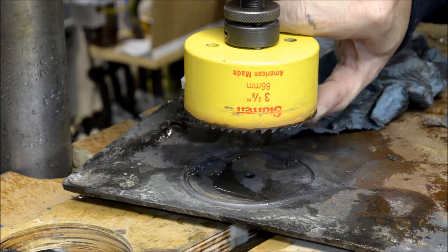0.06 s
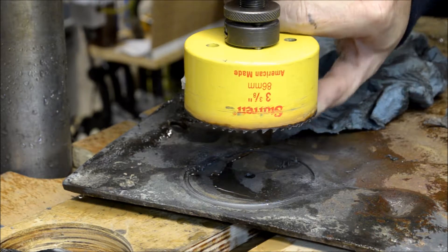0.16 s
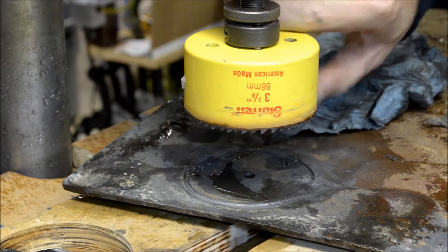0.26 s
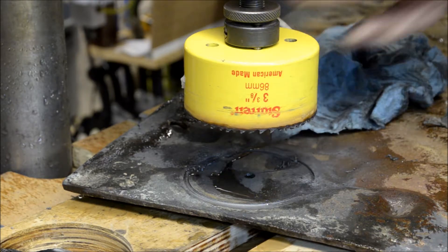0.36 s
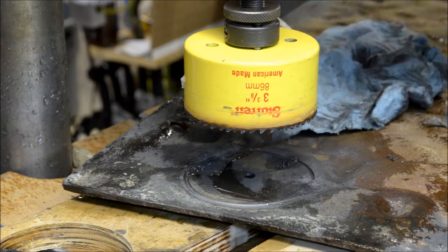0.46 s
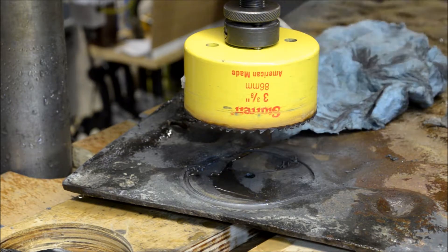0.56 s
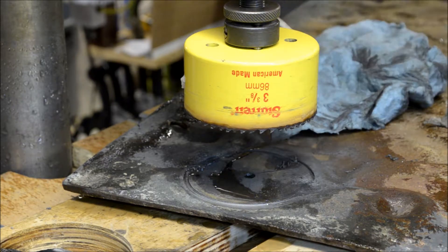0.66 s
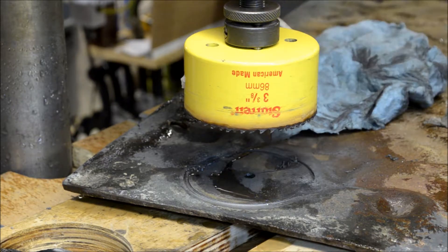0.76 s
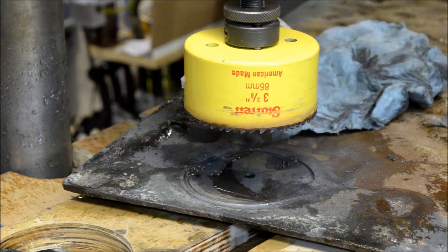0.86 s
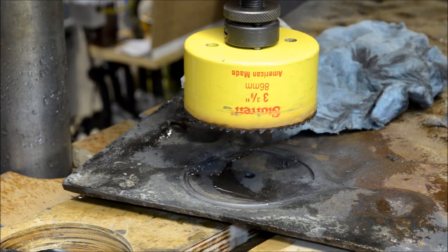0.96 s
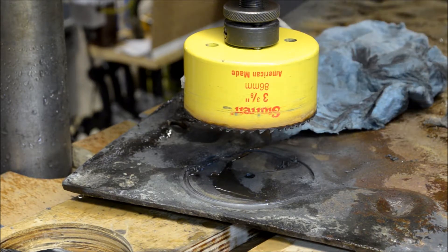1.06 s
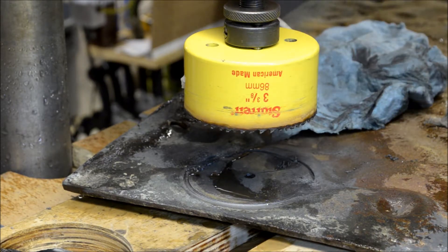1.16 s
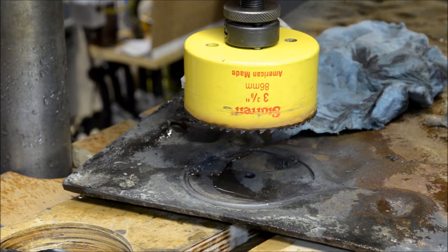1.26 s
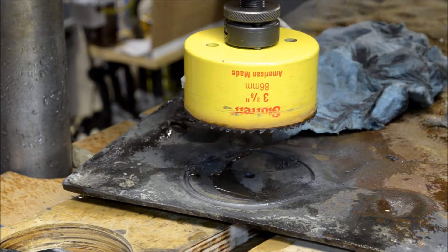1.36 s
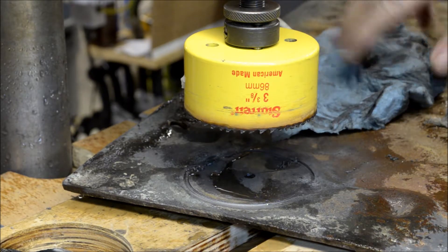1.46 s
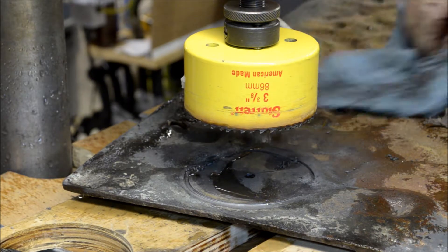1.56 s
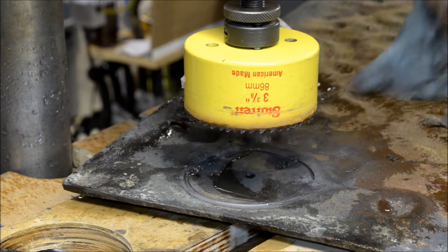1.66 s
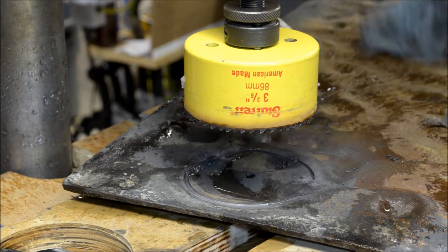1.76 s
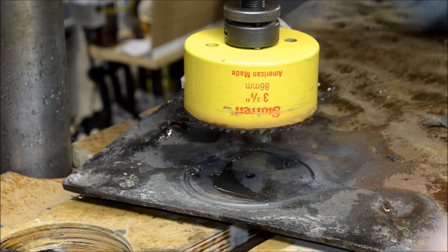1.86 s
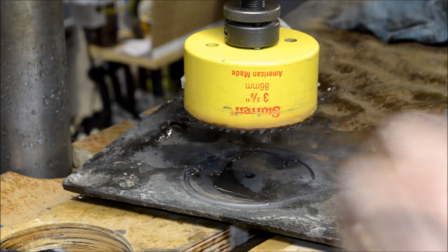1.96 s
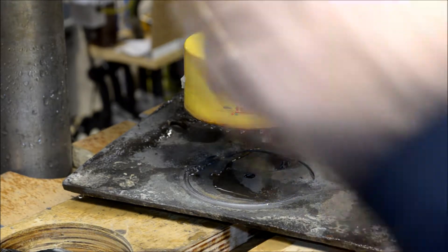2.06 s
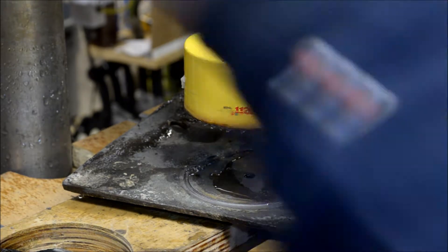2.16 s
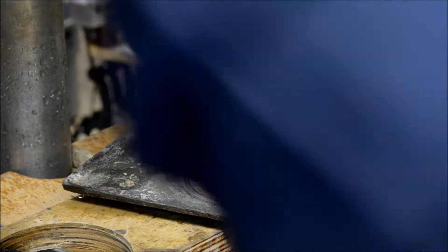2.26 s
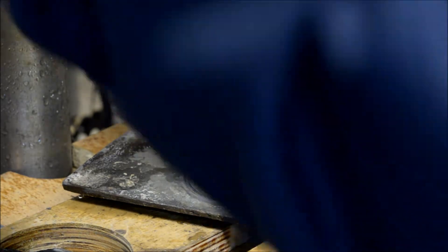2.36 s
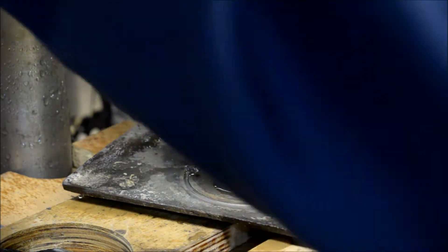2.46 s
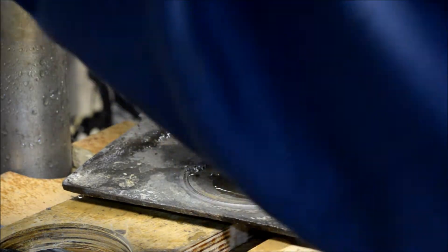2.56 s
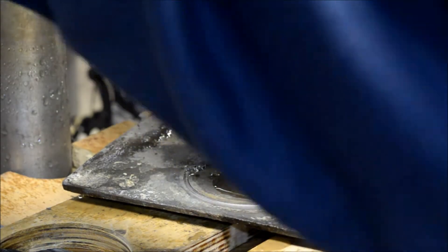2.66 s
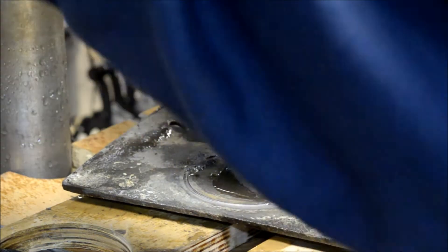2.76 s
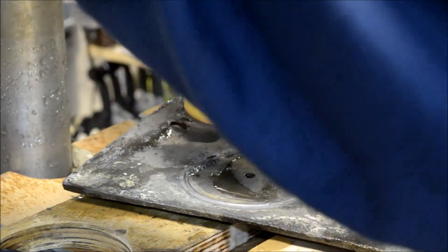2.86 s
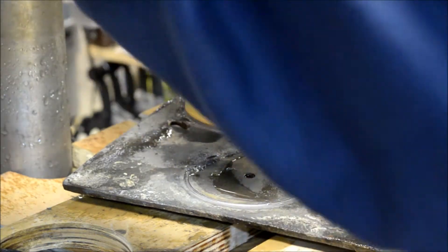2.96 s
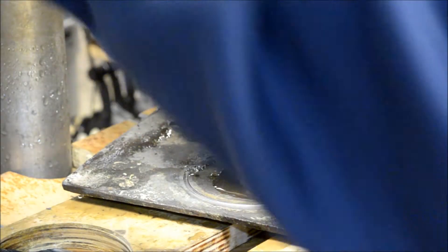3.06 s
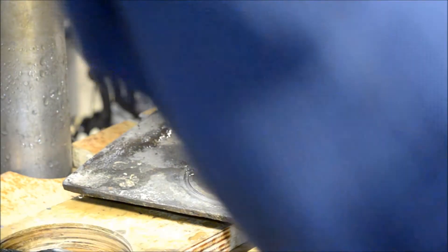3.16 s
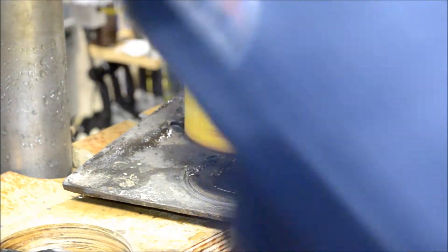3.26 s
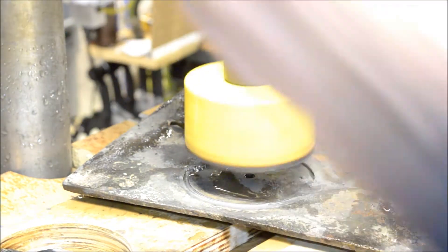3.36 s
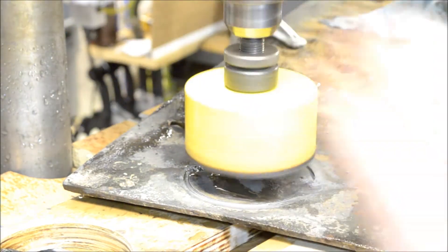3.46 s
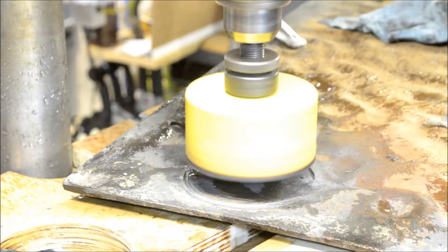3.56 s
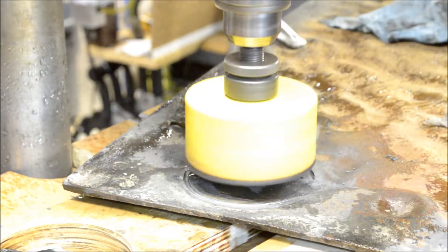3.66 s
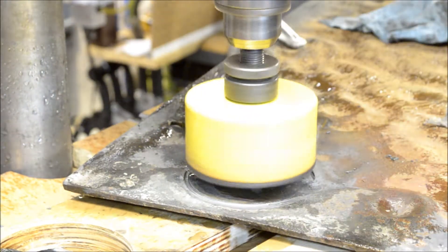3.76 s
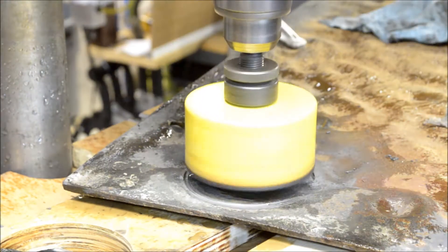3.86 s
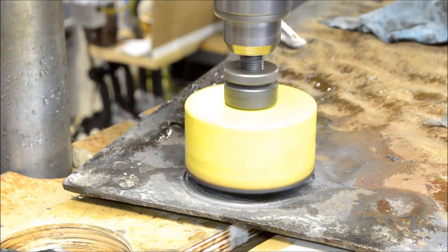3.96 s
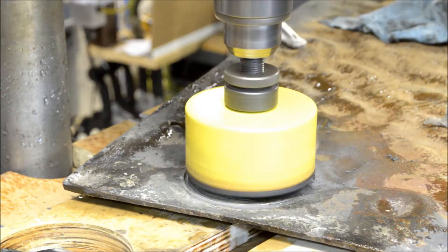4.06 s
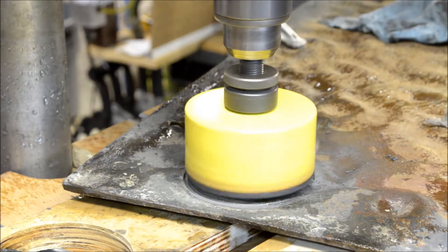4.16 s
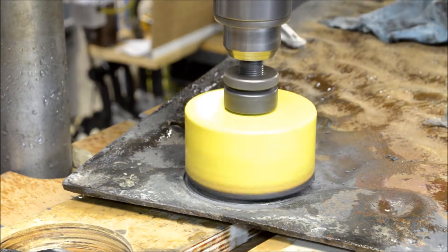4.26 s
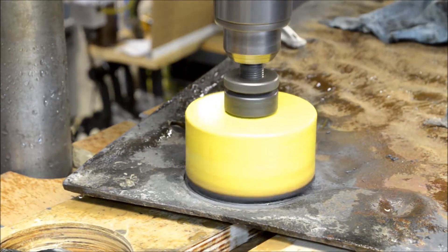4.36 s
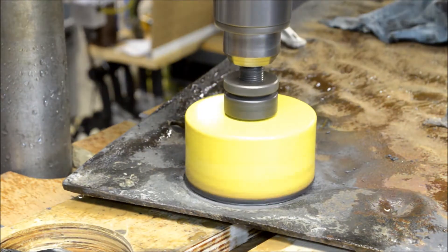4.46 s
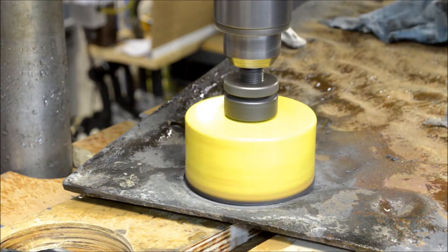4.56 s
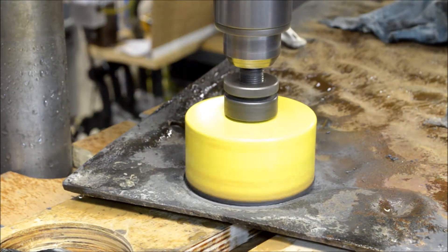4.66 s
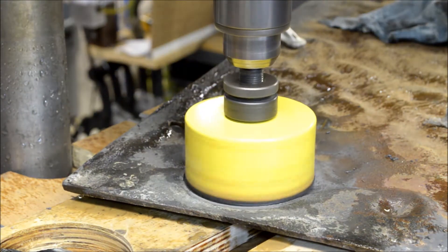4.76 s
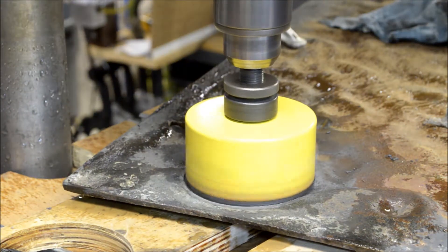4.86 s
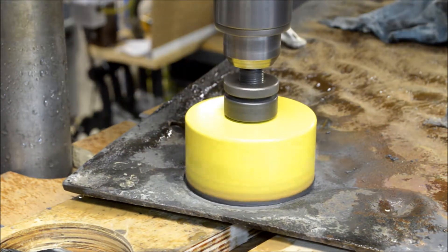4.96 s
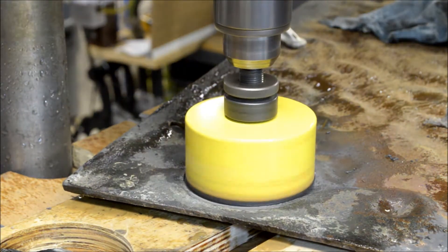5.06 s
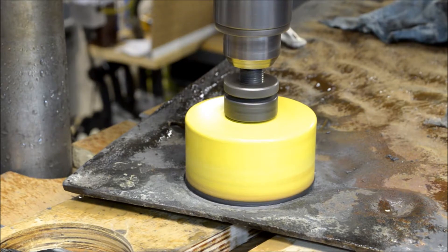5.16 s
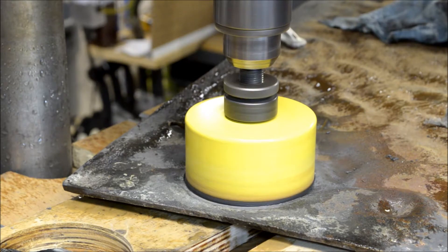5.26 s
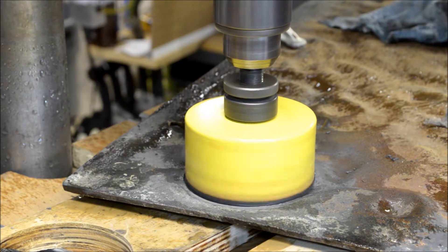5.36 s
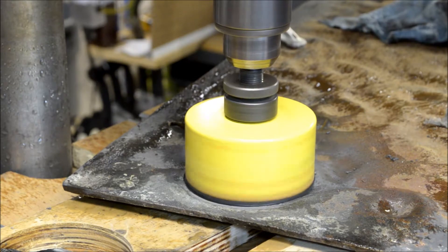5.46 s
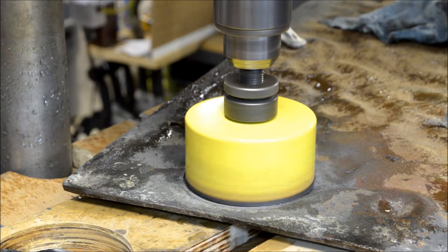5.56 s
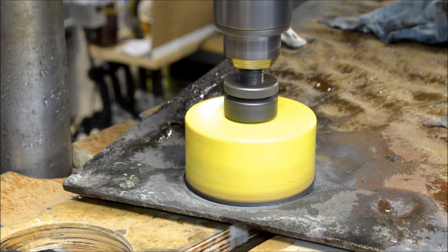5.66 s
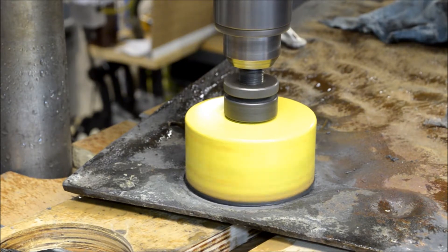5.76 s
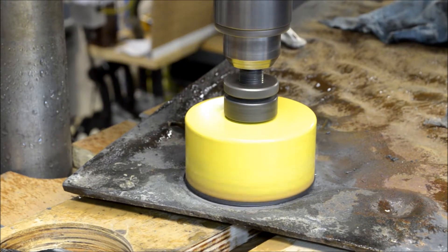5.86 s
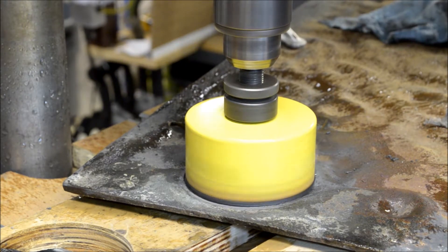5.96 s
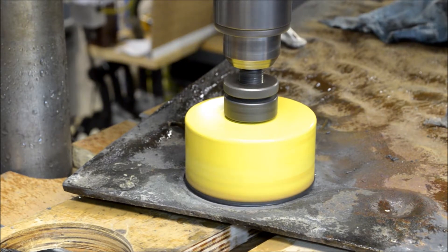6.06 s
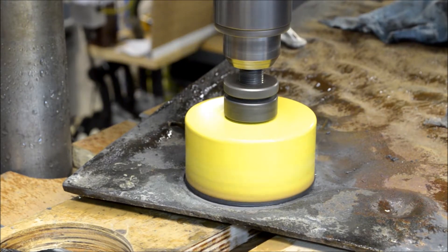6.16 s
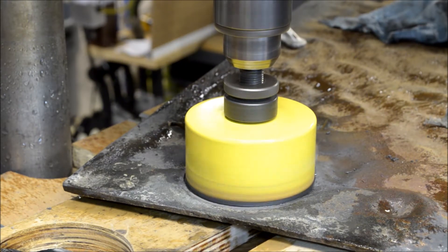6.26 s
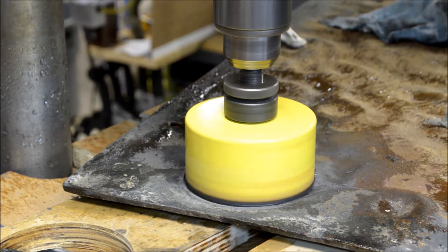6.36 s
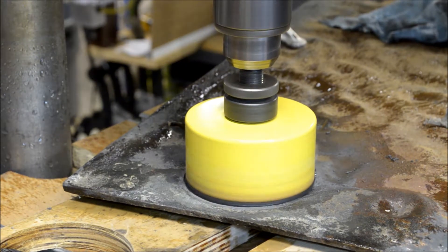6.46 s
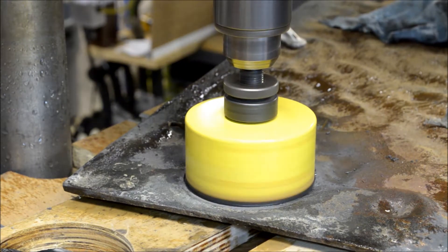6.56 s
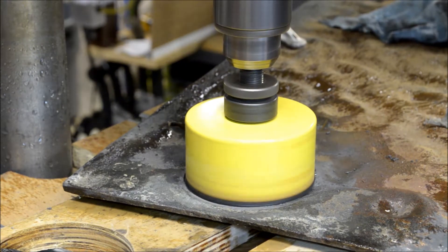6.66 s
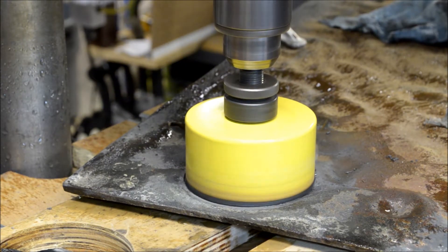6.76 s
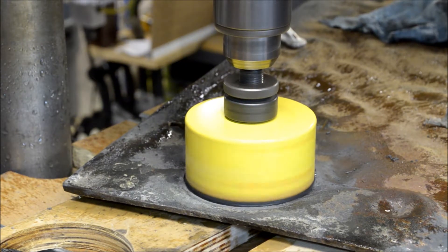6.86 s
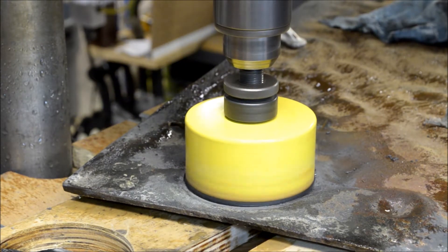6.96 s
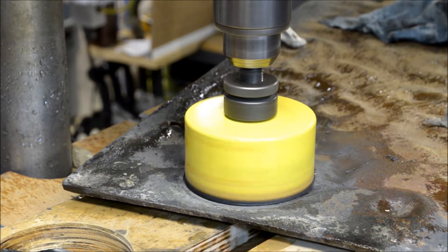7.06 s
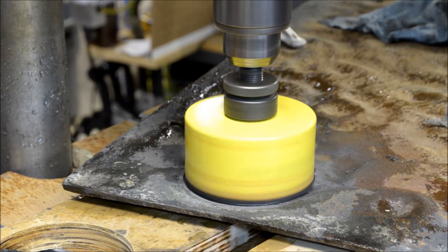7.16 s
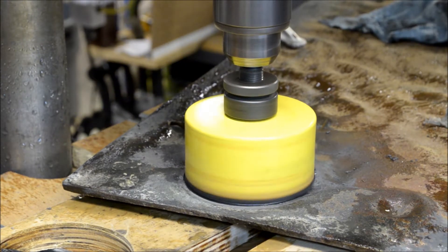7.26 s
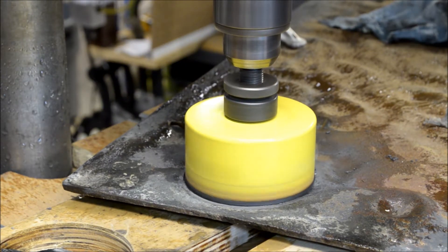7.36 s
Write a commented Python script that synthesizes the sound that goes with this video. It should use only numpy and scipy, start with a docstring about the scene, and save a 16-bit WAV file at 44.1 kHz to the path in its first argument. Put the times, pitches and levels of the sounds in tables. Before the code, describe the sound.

In a small workshop, light knocks on a bench mix with the faint rustle of a rag and sleeve. A switch snaps and a drill press jerks up to speed, humming and rattling as its shaft lowers. A hole saw skims a thick iron plate, then bites with a loud, ringing scrape that pulses rapidly. It eases off and touches down again near the end, all heard close up.

```python
"""A hole saw on a drill press cuts a thick iron plate: its teeth tear off chips with a loud, ringing scrape
that swells once a turn. First come light knocks and the rustle of a rag and sleeve in a small workshop.
Then the switch snaps, the motor jerks up to speed and the quill (the sliding shaft that lowers the saw)
rattles down. The saw skims the plate, bites, is eased off and comes down again.
Automatic gain control turns loud sound down, so the motor seems quieter while the saw cuts."""
import sys
import numpy as np
from scipy import signal
from scipy.fft import rfft, irfft
from scipy.io import wavfile
from scipy.ndimage import uniform_filter1d, minimum_filter1d, map_coordinates

SR = 44100
rng = np.random.default_rng(int(sys.argv[2]) if len(sys.argv) > 2 else 0)


def waveform_to_disk(signal):
    """Save audio, clipped to [-1, 1], as 16-bit WAV at the path in sys.argv[1]."""
    frames = np.transpose(np.atleast_2d(signal))
    scaled = np.clip(frames, -1, 1) * 32767
    samples = np.round(scaled).astype(np.int16)
    wavfile.write(sys.argv[1], SR, samples)


N = 326340
TIME = np.arange(N) / SR
FFT_SIZE = 2 ** 14
HZ = np.fft.rfftfreq(FFT_SIZE, 1 / SR)


def amp(db):
    """Turn decibels into a number to multiply by."""
    return 10 ** (np.asarray(db) / 20)


def unit(x):
    """Scale to an average (rms) strength of 1."""
    return x / np.sqrt(np.mean(x ** 2) + 1e-20)


def wobble(rate):
    """A smooth random curve with rate new values a second."""
    values = rng.standard_normal(N // 40)
    coarse = TIME[::8]
    return np.interp(TIME, coarse, map_coordinates(values, [coarse * rate], mode="mirror"))


def fade_in(start, length):
    """A ramp from 0 to 1; times in seconds."""
    return np.clip((TIME - start) / length, 0, 1)


def held(start, hold, rise, fall):
    """A loudness curve that rises, holds and dies away; times in seconds."""
    return fade_in(start, rise) * np.exp(-(np.maximum(TIME - start - hold, 0) / fall) ** 2)


def swells(rows):
    """One loudness curve for many touches, each rising to a peak and falling."""
    power = np.zeros(N)
    for at, db, rise, fall in rows:
        near = slice(max(0, int(at * SR) - SR // 3), int(at * SR) + SR // 3)
        t = TIME[near] - at
        power[near] += amp(db) ** 2 * np.exp(-2 * np.maximum(-t / rise, t / fall))
    return np.sqrt(power)


def grit(rate, spread_db):
    """A rough force: countless tiny snaps that bunch up rate times a second."""
    return unit(rng.standard_normal(N) * amp(spread_db * wobble(rate)))


def blow(at, t60, room_db, room_t60):
    """A short hit and the room's echo of it; a t60 is the seconds taken to fade by 60 dB."""
    t = np.arange(SR // 2) / SR
    fade = np.hypot(amp(-60 * t / t60), amp(room_db - 60 * t / room_t60))
    return np.pad(rng.standard_normal(len(t)) * fade, (round(at * SR), N))[:N]


def tones(rows, drift, drift_rate):
    """Pure tones that waver a little; drift is in radians."""
    return sum(amp(db) * np.sqrt(2) * np.sin(2 * np.pi * hz * TIME + drift * wobble(drift_rate))
               for hz, db in rows)


def ringing_filter(x, gain):
    """Give each frequency its own gain, so that ringing follows a hit (minimum phase)."""
    cepstrum = irfft(np.log(np.maximum(gain, 1e-6)), FFT_SIZE)
    cepstrum[1:FFT_SIZE // 2] *= 2
    cepstrum[FFT_SIZE // 2 + 1:] = 0
    return signal.oaconvolve(x, irfft(np.exp(rfft(cepstrum)), FFT_SIZE))[:N]


def body(force, colour, notes=()):
    """A shaken object has a colour (its mix of low and high) and ringing notes that stand above it."""
    hz, db = np.transpose(colour)
    broad = amp(np.interp(np.log(HZ + 1), np.log(hz), db))
    peaks = sum(amp(level) ** 2 / (1 + (2 * (HZ - centre) / width) ** 2)
                for centre, width, level in notes)
    return ringing_filter(force, unit(broad * np.sqrt(1 + peaks)))


def walls(x, echo_db, t60):
    """The drill's table, its column and the walls throw back many quick echoes."""
    t = np.arange(SR // 4) / SR
    echoes = rng.standard_normal(len(t)) * amp(-60 * t / t60) * (t > .002)
    reflected = signal.fftconvolve(x, echoes / np.linalg.norm(echoes))[:N]
    return (x + amp(echo_db) * reflected) / np.hypot(1, amp(echo_db))


# colour of the room's air, and the tones of its hum: f/Hz, level/dB
AIR_COLOUR = [(15, -42), (25, -13), (75, -10), (250, -5.5), (309, -8), (543, -6.5), (588, -10), (1460, -14),
              (1760, -13), (3010, -18.5), (4500, -21), (5570, -22), (8320, -27), (15000, -38)]
SHOP_HUM = [(57, -75), (120, -84.5), (529, -73)]
def shop():
    """Still air and a faint, steady hum."""
    air = amp(-67) * body(rng.standard_normal(N), AIR_COLOUR)
    return air + tones(SHOP_HUM, drift=0.6, drift_rate=9.8)


# strokes of rag and sleeve, and one brisk brush: t/s, level/dB, rise/s, fall/s
RAG_STROKES = [(.72, -60, 0.1, 0.16), (1.6, -62, 0.06, .12), (2.42, -64.5, 0.45, 0.27),
               (2.68, -58, 0.076, 0.075)]
BRISK_BRUSH = [(.872, -47, .016, .034)]
# colours of the strokes and of the brush: f/Hz, level/dB
RAG_COLOUR = [(60, -16), (200, 1), (700, 0.5), (2000, 2), (4500, -2.5), (8500, -4.5), (11000, -14),
              (15000, -32)]
BRUSH_COLOUR = [(60, -19), (170, 10), (300, 1), (1200, -5), (3000, -3), (4200, 1), (5200, -7), (8500, -6),
                (11000, -23), (15000, -28)]
def cloth():
    """Fibres rub as a rag is pulled away and a sleeve sweeps past."""
    rubbing = swells(RAG_STROKES) * grit(rate=400, spread_db=1.3)
    brushing = swells(BRISK_BRUSH) * grit(rate=340, spread_db=-1.5)
    return body(rubbing, RAG_COLOUR) + body(brushing, BRUSH_COLOUR)


# things set down: t/s, clack level/dB, thud level/dB, wait until the drop/s
BENCH_KNOCKS = [(0.139, -43, -42, 0.012), (0.256, -36, -36, .002), (0.835, -37.5, -45, .004),
                (1.014, -33.5, -23, .03), (1.17, -37.5, -26.5, .002), (1.232, -36.5, -26, .018),
                (1.346, -39, -27, .002), (2.49, -28, -26, 0.024)]
# the bench's colour: f/Hz, level/dB; its notes: f/Hz, width/Hz, boost/dB
BENCH_COLOUR = [(60, -19), (200, -11), (400, -2), (1400, 2.5), (2500, -20.5), (4500, -24.5), (7000, -23),
                (14000, -50)]
BENCH_NOTES = [(412, 40, 13.6), (802, 40, 10.6), (886, 40, 11), (1331, 26, 12), (2280, 240, 15.7),
               (2620, 120, 19), (3414, 306, 15.7), (4107, 590, 10), (5000, 220, 12)]
def knocks():
    """Each thing clacks on the bench with an edge, then drops flat with a clack and a thud."""
    soft, hard = np.zeros(N), np.zeros(N)
    for start, clack_db, thud_db, wait in BENCH_KNOCKS:
        edge, drop = [blow(at, t60=0.054, room_db=-4.5, room_t60=0.29) for at in (start, start + wait)]
        soft += amp(thud_db) * (amp(-11) * edge + drop)
        hard += amp(clack_db) * (edge + amp(-2) * drop)
    thud = signal.lfilter(*signal.butter(2, 620, "low", fs=SR), soft)
    clack = signal.lfilter(*signal.butter(2, 620, "high", fs=SR), hard)
    return amp(-9.5) * body(thud - clack, BENCH_COLOUR, BENCH_NOTES)


# sharp ticks: t/s, relative level/dB
SHARP_TICKS = [(0.26, -56), (1.344, -58), (1.7469, -51.5), (1.803, -58), (1.8392, -54), (2.82, -46),
               (2.8498, -15.5), (3.0071, -19.5)]
# the ticks' colour: f/Hz, level/dB; their notes: f/Hz, width/Hz, boost/dB
TICK_COLOUR = [(60, -30), (300, -1), (1500, -13), (5000, -7), (9000, 5), (15000, -15)]
TICK_NOTES = [(3430, 350, 21), (8450, 250, 2.8)]
def ticks():
    """Sharp ticks: the bright edge of two bench knocks, small clicks, and the switch's loud snap."""
    force = sum(amp(db - 7.5) * blow(at, t60=0.063, room_db=-19, room_t60=0.17)
                for at, db in SHARP_TICKS)
    return body(force, TICK_COLOUR, TICK_NOTES)


# the saw slows down as it works: t/s, speed/(turns per s)
SAW_SPEED = [(4.55, 11.9), (4.9, 11.08), (5.55, 11.2), (5.9, 10.47), (6.5, 10.15), (7.0, 10.35),
             (7.3, 11.5)]
def saw_angle():
    """How far the saw has turned, in radians; it digs deepest near each whole turn."""
    turns = np.cumsum(np.interp(TIME, *np.transpose(SAW_SPEED))) / SR
    deepest_s = 4.92
    return 2 * np.pi * (turns - np.interp(deepest_s, TIME, turns))


MOTOR_ON_S, SURGE_S, FEED_S = 2.858, 0.18, 3.786  # motor starts; how long it strains; quill starts down
def effort():
    """The motor strains at first, settles, then works a little harder as the quill goes down."""
    idle_db = -34.5
    surge_db = 8 * held(MOTOR_ON_S, SURGE_S, rise=.002, fall=0.05)
    feed_db = 2 * fade_in(FEED_S, 0.04)
    return amp(idle_db + surge_db + feed_db) * fade_in(MOTOR_ON_S, 0.0059)


# the motor's tones (close ones throb together): f/Hz, relative level/dB
MOTOR_HUM = [(59.3, -47), (118.6, -28.5), (232, -22), (239.8, -13.5), (250, -15), (329.4, -18),
             (359.5, -13), (389.5, -8.5)]
# the frame's colour: f/Hz, level/dB; its notes: f/Hz, width/Hz, boost/dB
FRAME_COLOUR = [(30, -44), (75, -21), (115, -13.5), (160, -11), (205, -21), (235, -10.5), (440, 5),
                (580, -8.5), (850, -3), (1400, -3), (4500, -11), (6400, -10), (9000, -20), (11000, -31),
                (15000, -47)]
FRAME_NOTES = [(233.3, 4.7, 15), (250, 9.9, 18.2), (332.5, 4.7, 9.2), (387, 30, 4.6), (553.4, 21, 9.6),
               (673, 17, 10.2), (769, 35, 12.4), (870, 86, 9.1), (1116, 54, 6.5), (1210, 20, 6.9),
               (1337, 53, 5.5), (1730, 24, 6.6), (2000, 20, 6.1)]
def motor(angle):
    """The motor hums, belt and bearings shake the frame, and the starting jerk makes it boom."""
    level = effort()
    shake = amp(1.02) * grit(rate=300, spread_db=1.6) * amp(np.cos(angle))
    hum = tones(MOTOR_HUM, drift=0.27, drift_rate=9.9)
    jerk = held(MOTOR_ON_S, SURGE_S, rise=.02, fall=0.016)
    boom = jerk * tones([(251, -29.5), (770, -37), (820, -42)], drift=0.86, drift_rate=23)
    return body(level * shake, FRAME_COLOUR, FRAME_NOTES) + level * hum + boom


def rattles(db, jolt_db):
    """Four rattles, one a turn, as the quill starts down; the extra jolt_db about halves each turn."""
    turn_s, rise_s, fall_s = 1 / SAW_SPEED[0][1], .009, 0.022
    return swells([(FEED_S + k * turn_s, db + jolt_db * 0.51 ** k, rise_s, fall_s) for k in range(4)])


# loose drive parts clatter: t/s, level/dB, rise/s, fall/s
DRIVE_CLATTER = [(2.871, -18, 0.0036, 0.012), (3.03, -30.5, 0.049, 0.038), (4.325, -32.5, .004, 0.024)]
# colours of the quill and its collar: f/Hz, level/dB
QUILL_COLOUR = [(60, -45), (200, -27), (400, 4.5), (620, -4), (1400, 3), (3000, -9), (5000, -6.5),
                (9200, -15), (10500, -26), (15000, -51)]
COLLAR_COLOUR = [(300, -36), (2000, 2.5), (3300, -3.5), (4500, -10.5), (15000, -41)]
# notes of the quill, the collar's chime and its high ring: f/Hz, width/Hz, boost/dB
QUILL_NOTES = [(870, 44, 3.6), (1330, 58, 5.7), (1480, 37, 1.7), (2300, 200, 5), (8850, 250, 6.9),
               (9240, 79, 10.6), (14076, 368, 14)]
CHIME_NOTES = [(2440, 280, 12), (2710, 83, 12), (3150, 120, 16)]
RING_NOTES = [(3215, 130, 18.5), (4020, 120, 12)]
def quill(angle):
    """Loose parts clatter; the collar chimes, and its high ring swells once a turn as the shaft spins."""
    slack = np.hypot(swells(DRIVE_CLATTER), rattles(db=-26, jolt_db=10))
    clatter = body(slack * grit(rate=700, spread_db=2), QUILL_COLOUR, QUILL_NOTES)
    collar_taps = rattles(db=-24.5, jolt_db=0) * grit(rate=770, spread_db=1.0)
    chime = body(collar_taps, COLLAR_COLOUR, CHIME_NOTES)
    collar_shake = effort() * amp(-12 + 2 * np.cos(angle)) * rng.standard_normal(N)
    return clatter + chime + body(collar_shake, COLLAR_COLOUR, RING_NOTES)


# the teeth skim the plate: t/s, hold/s, level/dB
SAW_GRAZES = [(4.468, 0.045, -23), (4.548, .21, -25), (7.134, 0.017, -22.5), (7.254, 0.023, -20.5),
              (7.309, 0.062, -33), (7.383, .02, -26)]
# colour of the saw's steel cup: f/Hz, level/dB; its notes: f/Hz, width/Hz, boost/dB
CUP_COLOUR = [(60, -35), (220, -8), (400, 9), (1000, 3.5), (3000, 1.5), (5000, -4), (9700, -6), (11500, -5),
              (15000, -21)]
CUP_NOTES = [(1236, 106, 11), (3050, 140, 3), (4290, 110, 8.9), (4590, 160, 13), (6190, 125, 18.7),
             (8230, 51, 22.6), (8400, 109, 16), (10760, 400, 7.4)]
def saw_grazes():
    """Light touches, uneven from tooth to tooth, let the cup-shaped saw ring freely."""
    touch = sum(amp(db) * held(at, hold, rise=0.0056, fall=.016) for at, hold, db in SAW_GRAZES)
    chatter = amp(2.2 * wobble(70))
    return body(touch * chatter * grit(rate=700, spread_db=1.8), CUP_COLOUR, CUP_NOTES)


# the teeth bite into the plate: t/s, hold/s, starting level/dB
SAW_BITES = [(4.562, .05, -24), (4.678, 2.314, -14), (7.382, .05, -22)]
def cut_depth(angle):
    """The hand presses harder, then relaxes; the saw is off centre, so its load dips once a turn."""
    press_db, press_s, relax_db_per_s = 20.5, 0.4, 6
    swell_db, evening_db_per_s = 3.5, 1.12  # the swell shrinks as the groove evens out
    lopsided = np.cos(angle) - np.cos(2 * angle) / 5 - np.sin(2 * angle) / 8  # broad swells, short dips
    power = np.zeros(N)
    for at, hold, db in SAW_BITES:
        t = np.maximum(TIME - at, 0)
        pressure_db = press_db * (1 - np.exp(-t / press_s)) - relax_db_per_s * t
        swing_db = np.maximum(swell_db - evening_db_per_s * t, 0) * fade_in(at, press_s)
        contact = held(at, hold, rise=0.011, fall=0.13)  # teeth catch at once and are eased out slowly
        power += (contact * amp(db + pressure_db + swing_db * lopsided)) ** 2
    return np.sqrt(power)


# the iron plate's colour: f/Hz, level/dB; its notes: f/Hz, width/Hz, boost/dB
IRON_COLOUR = [(60, -44), (205, -35.5), (240, -17.5), (1000, -11), (1400, -2), (2050, -2.5), (2500, 0),
               (3000, -1), (3900, -0.5), (5000, 0), (8600, -11.5), (9800, -21), (11000, -19.5),
               (15000, -42)]
IRON_NOTES = [(254, 15, 6), (436, 38, 8), (548, 20, 9), (688, 13, 9), (871, 46, 7), (1250, 52, 2),
              (1340, 29, 6), (1550, 16, 5), (1733, 61, 3), (1788, 15, 6), (1886, 64, 4), (2104, 16, 8),
              (2150, 9, 9), (2283, 71, 8), (2331, 17, 12), (2436, 63, 7), (2585, 9, 8), (2621, 33, 11),
              (2668, 14, 12), (2765, 47, 7), (2799, 24, 12.5), (3015, 20, 10), (3130, 86, 4), (3305, 90, 5),
              (3488, 18, 8), (3591, 19, 5), (3654, 17, 6), (4505, 12, 5), (5068, 22, 3), (8640, 132, 3)]
def saw_cut(angle):
    """Teeth tear chips from the plate and make it ring; a deeper cut is louder."""
    chips = cut_depth(angle) * grit(rate=600, spread_db=1.5)
    return body(chips, IRON_COLOUR, IRON_NOTES)


def scene():
    """The drill with its echoes and the quiet workshop sounds, all at one microphone."""
    angle = saw_angle()
    drill = motor(angle) + quill(angle) + saw_cut(angle) + saw_grazes()
    drill_in_room = walls(drill, echo_db=-14, t60=.17)
    return (shop() + knocks() + cloth() + ticks() + drill_in_room)[None]


def gain_control(x):
    """Loud sound turns the volume down quickly; it stays down a moment, then creeps back."""
    limit_db, attack_s, hold_s, recover_db_per_s = -16, 0.0068, 0.098, 55
    power = np.abs(uniform_filter1d(x ** 2, size=SR // 60)) + 1e-12
    needed_db = np.minimum(limit_db - 10 * np.log10(power), 0)
    half_hold = int(hold_s * SR / 2)
    held_db = minimum_filter1d(needed_db, 2 * half_hold + 1, origin=half_hold)
    recovery_db = recover_db_per_s * TIME
    gain_db = np.minimum.accumulate(held_db - recovery_db) + recovery_db
    step = 1 / (attack_s * SR)
    return x * amp(signal.lfilter([step], [1, step - 1], gain_db))


# narrow bands weakened by the microphone's opening: f/Hz, width/Hz, level/dB
MIC_DIPS = [(5720, 380, -12), (6930, 200, -9)]
def record(dry):
    """The microphone dulls two bands, gain control acts, peaks round off and the top treble is cut."""
    ceiling, top_hz = .54, 15700
    dips_db = sum(db / (1 + (2 * (HZ - hz) / width) ** 2) for hz, width, db in MIC_DIPS)
    levelled = gain_control(ringing_filter(dry[0], amp(dips_db)))
    rounded = levelled / (1 + np.abs(levelled / ceiling) ** 8) ** (1 / 8)
    low_pass = signal.firwin(801, top_hz, fs=SR)
    return signal.oaconvolve(rounded, low_pass, mode="same")[None]


dry = scene()
out = record(dry)
waveform_to_disk(out)
```